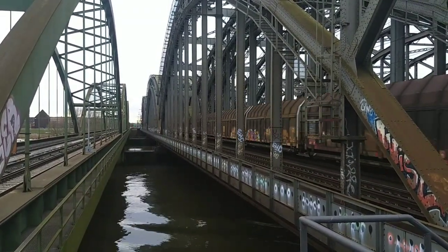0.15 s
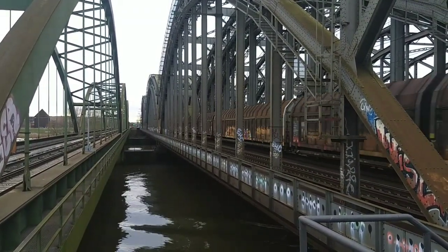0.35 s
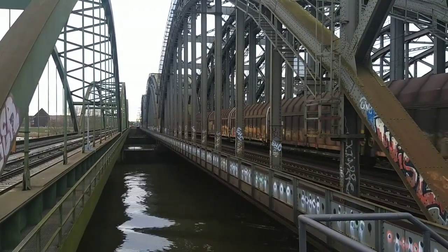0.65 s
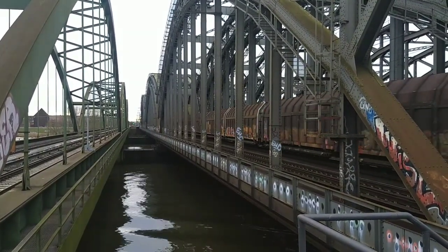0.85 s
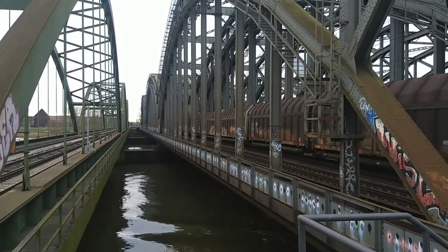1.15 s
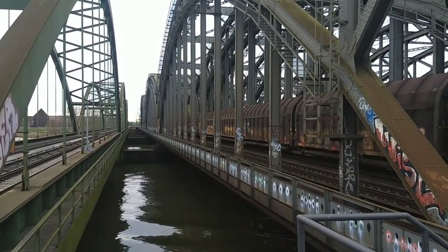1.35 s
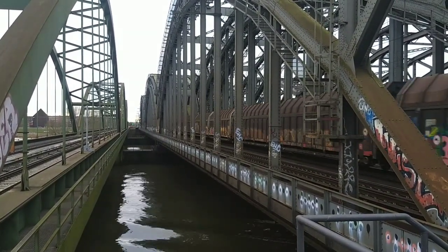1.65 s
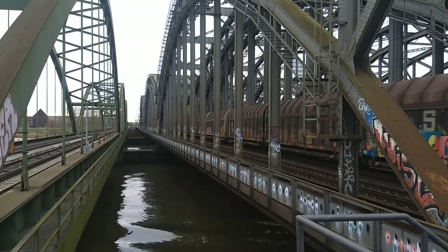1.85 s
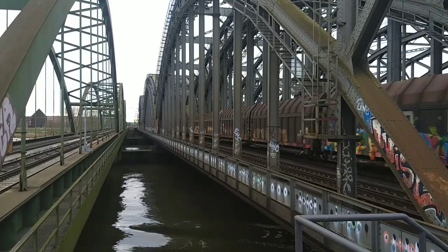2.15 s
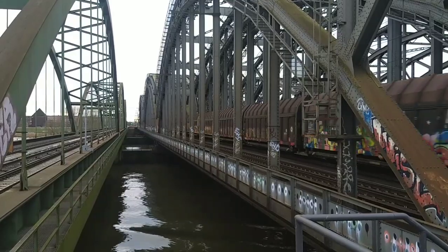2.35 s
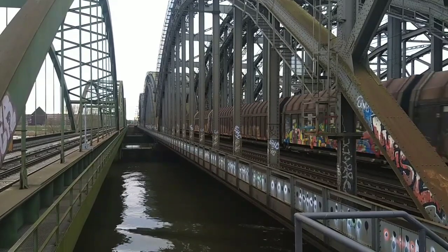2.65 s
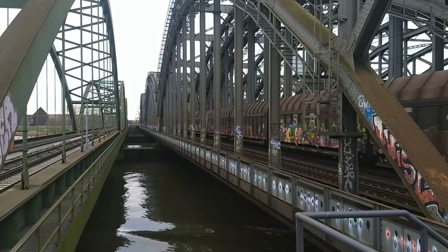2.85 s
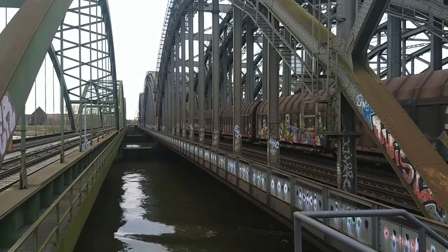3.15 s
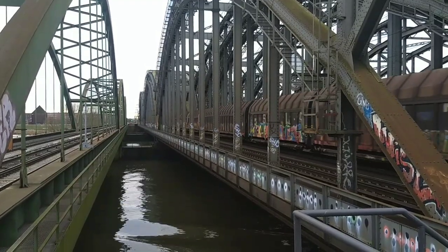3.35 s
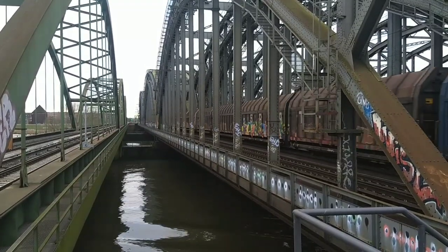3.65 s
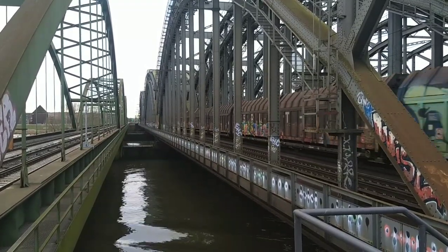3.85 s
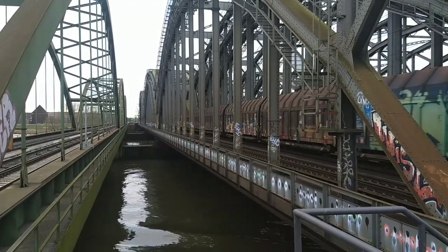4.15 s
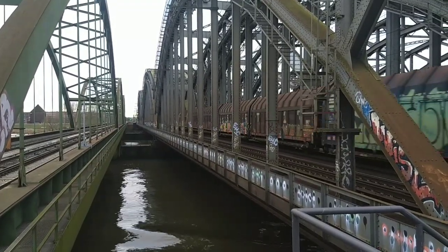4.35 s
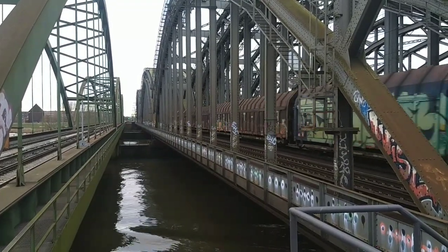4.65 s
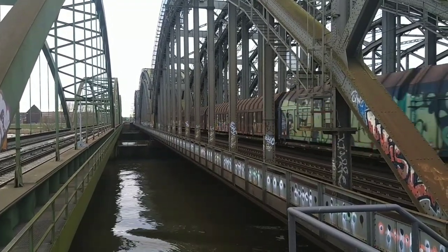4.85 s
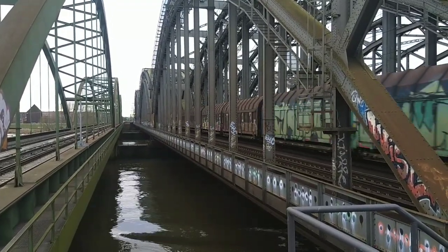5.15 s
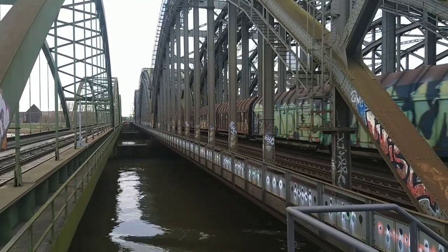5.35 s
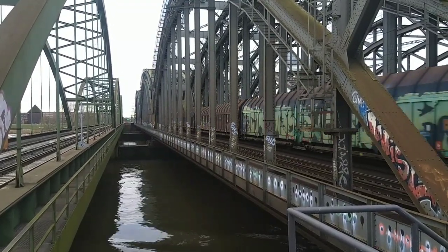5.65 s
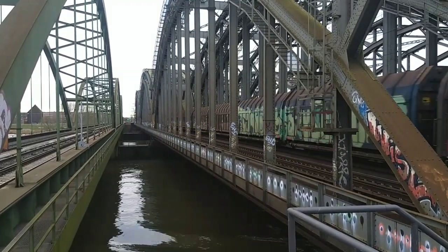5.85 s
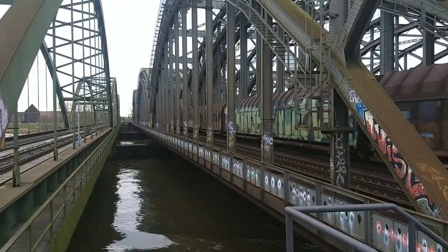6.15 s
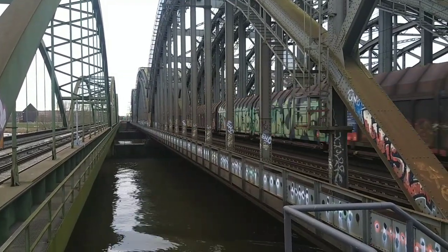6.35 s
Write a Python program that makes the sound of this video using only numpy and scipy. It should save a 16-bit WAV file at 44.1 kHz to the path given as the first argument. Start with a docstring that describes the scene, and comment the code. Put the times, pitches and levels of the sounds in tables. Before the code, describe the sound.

From 0 s a long freight train is in full passage over a steel truss bridge, heard close by from the side walkway in wide stereo. A loud, dense, hollow roar of girders and rails fills the low-mid range, above a softer span drone and deck rumble. Wheels add grainy metallic ringing and a thin, diffuse hiss. The roar flutters throughout, with short low bumps and tiny dips; the hiss thins around 0.7-1 s, then rises near 1.6 s. Blunt faint knocks at about 1 and 1.9 s are nearly buried. Narrow raspy steel tones swell and fade, some low and humming, others higher, with short scrapy touches near 3.6 and 3.9 s. From 5 to 6 s a few more dull knocks surface slightly at about 5.0, 5.3 and 5.9 s. The wheel noise ends a little brighter, still rolling at full strength when it stops around 6.5 s.

```python
"""A long freight train rolls steadily over a steel truss bridge, heard in stereo from the walkway beside it.
From the start, noise bands roar and hiss: rough wheels shake span, deck, girders and rails, wheels ring and hiss.
All along, the low bands briefly swell or sink and single steel modes sing as narrow noise that swells and fades.
Six faint blunt accents near 1 and 1.9 s and from 5 to 6 s lie almost buried in the roar.
Two microphone ports, each less a delayed share of the other, widen the picture throughout."""
import sys
import numpy as np
from scipy import signal
from scipy.fft import rfft, irfft
from scipy.io import wavfile
from scipy.ndimage import uniform_filter1d, minimum_filter1d

SR = 44100
rng = np.random.default_rng(int(sys.argv[2]) if len(sys.argv) > 2 else 0)


def file_out(sig):
    """Save sig as 16-bit WAV at sys.argv[1]."""
    # one column per channel
    cols = np.atleast_2d(sig).T
    # limit, then scale
    lim = np.clip(cols, -1, 1)
    pcm = np.round(lim * 32767).astype(np.int16)
    wavfile.write(sys.argv[1], SR, pcm)


N = 287091

# how alike the two ports hear the bridge: freq_hz, likeness_0_to_1
PORT_LIKENESS = [(30, .58), (70, 0.7), (150, 0.88), (300, 0.9), (430, 0.76), (520, 0.63), (650, 0.9),
                 (1000, 0.77), (1400, 0.3), (1700, 0.28), (3000, 0.08), (15000, 0)]


def from_db(db):
    """Decibels to amplitude gain."""
    return 10 ** (np.asarray(db) / 20)


def rms_one(x):
    """The same signal at rms 1."""
    return x / np.sqrt(np.mean(x ** 2) + 1e-20)


def in_time(rows):
    """Each column of a time table, interpolated to every sample."""
    time_s, *columns = np.transpose(rows)
    return [np.interp(np.arange(N) / SR, time_s, column) for column in columns]


def bins():
    """Frequency of each spectral bin in Hz, at least 1."""
    return np.maximum(np.arange(N // 2 + 1) * SR / N, 1)


def at_hz(points, hz):
    """A table read on a log-frequency axis."""
    freq_hz, value = np.transpose(points)
    return np.interp(np.log(hz), np.log(freq_hz), value)


def likeness(hz):
    """Correlation of the two ports at a frequency: high in the bass, none at the top."""
    return np.clip(at_hz(PORT_LIKENESS, hz), 0, .98)


def drift(rate_hz):
    """Slow chance: noise at every 40th sample through a double one-pole low-pass; rms 1."""
    step, settle = 40, 2000
    pole = np.exp(-2 * np.pi * rate_hz * step / SR)
    noise = rng.standard_normal(N // step + settle + 2)
    slow = signal.lfilter([1], [1, -2 * pole, pole ** 2], noise)[settle:]
    return np.interp(np.arange(N) / step, np.arange(len(slow)), rms_one(slow))


def swells(times_s, heights, sigma_s):
    """A Gaussian rise (or fall, if negative) at each moment, summed at every sample."""
    t = np.arange(N) / SR
    rows = np.broadcast(times_s, heights, sigma_s)
    return sum(height * np.exp(-((t - s) / sigma) ** 2 / 2) for s, height, sigma in rows)


def ring(clicks, hz, t60_s):
    """A two-pole resonance: a unit click sets a mode of height 1 ringing, with little bass below it."""
    pole = from_db(-60 / (t60_s * SR))
    turn = 2 * np.pi * hz / SR
    # the tiny offset keeps the decay clear of denormals
    return signal.lfilter([.5, 0, -.5], [1, -2 * pole * np.cos(turn), pole ** 2], clicks + 1e-18)


def at_ports(gain):
    """Coloured noise at two ports of unequal sensitivity: alike in the bass, unrelated in the treble; rms 1."""
    # left over right sensitivity: freq_hz, difference_db
    facing_db = [(30, 1), (150, 0.5), (300, 1), (480, 1), (650, 0), (1800, 6.5), (3000, -1.5), (4200, 5.5),
                 (8500, 6), (13000, 0)]
    hz = bins()
    alike = likeness(hz)
    common, apart = rng.standard_normal((2, len(hz))) + 1j * rng.standard_normal((2, len(hz)))
    sides = np.array([[1], [-1]])
    ports = np.sqrt(1 + alike) * common + np.sqrt(1 - alike) * apart * sides
    facing = from_db(sides * at_hz(facing_db, hz) / 2)
    return rms_one(irfft(gain * ports * facing / np.hypot(*facing), N))


def shaken(spectrum, steadiness, span_s):
    """Noise for one part's overlapping modes; many axles keep the drive even, so its power is levelled."""
    hz = bins()
    inside = (hz >= spectrum[0][0]) & (hz <= spectrum[-1][0])
    noise = at_ports(from_db(at_hz(spectrum, hz)) * inside)
    power = uniform_filter1d(noise.mean(axis=0) ** 2, max(int(span_s * SR), 2))
    return rms_one(noise / (power + 1e-9) ** (steadiness / 2))


def driven(drive, course_db, lull_db, flutter_hz):
    """Gain of one part: it takes its share of a level course and of the dips, and flutters by itself."""
    level_db, follows, dips, flutter_db = drive
    return from_db(level_db + follows * course_db - dips * lull_db + flutter_db * drift(flutter_hz))


def truss(x, ripple_db, width_hz, hold_s):
    """Echoes between the girders interfere: narrow peaks and dips wander as the wagons move on."""
    size = 4096
    overlap = size * 3 // 4
    hz, t, frames = signal.stft(x, SR, nperseg=size, noverlap=overlap)
    ripple = rng.standard_normal(frames.shape[1:])
    for _ in range(2):
        ripple = uniform_filter1d(ripple, max(round(width_hz / hz[1]), 1), axis=0)
        ripple = uniform_filter1d(ripple, max(round(hold_s / t[1]), 1), axis=1)
    # each peak takes its power from the dips beside it
    ripple = ripple - uniform_filter1d(ripple, size=13, axis=0)
    gain = rms_one(from_db(ripple_db * rms_one(ripple)))
    return signal.istft(frames * gain, SR, nperseg=size, noverlap=overlap)[1][:, :N]


def accents(level_db, scatter_db, burst_db, burst_t60_s, cutoff_hz):
    """Faint blunt accents in the roar: short noise bursts through decaying resonances, each with its own strength."""
    # accents: time_s, relative_peak_db
    moments = [(0.982, 0), (1.892, 2), (5.009, -2.5), (5.329, 3), (5.916, 2), (5.984, -1)]
    # accent resonances: freq_hz, relative_level_db, t60_s
    resonances = [(244, -10, 0.1), (321, -12, 0.2), (343.5, -2, 0.13), (620, -1, 0.093), (667, -9.5, 0.22),
                  (779, -5, 0.16), (873, -8, 0.074), (1200, -28, 0.083), (1640, -22, 0.051),
                  (3100, -28, .05)]
    time_s, peak_db = np.transpose(moments)
    out = np.zeros((2, N))
    for hz, mode_db, t60_s in resonances:
        strength_db = peak_db + mode_db + level_db + scatter_db * rng.standard_normal(len(time_s))
        clicks = np.zeros(N)
        clicks[(time_s * SR).astype(int)] = from_db(strength_db)
        out += ring(clicks, hz, t60_s) * rng.choice([-1, 1])
    t = np.arange(SR // 4) / SR
    burst = from_db(burst_db - 60 * t / burst_t60_s) * rng.standard_normal((2, len(t)))
    burst[:, 0] = 1  # a unit click comes first
    blunt = signal.butter(2, cutoff_hz, fs=SR, output="sos")
    return signal.sosfilt(blunt, signal.fftconvolve(out, burst, axes=1)[:, :N])


def singing():
    """Wheel, rail or girder modes swell and fade as narrow noise; the wider the band, the more it rasps."""
    # notes: loudest_s, sigma_s, freq_hz, level_db (rms before the swell), width_hz
    notes = [(.07, .04, 13000, -76, 60), (.19, .05, 8634, -66, 60), (.38, .06, 7990, -66, 60),
             (0.424, .08, 150, -29.5, 18), (0.032, .04, 322, -27, 24), (.6, .15, 316, -23, 58),
             (1.0, 0.054, 3369, -47, 35), (1.0, .06, 642, -29.5, 30), (1.45, 0.28, 1760, -41, 27),
             (1.53, 0.066, 3530, -43, 55), (1.55, 0.17, 1004, -33, 23), (1.62, 0.03, 3730, -35.5, 220),
             (1.62, .1, 13000, -79, 70), (2.09, .05, 3250, -44, 300), (2.15, .1, 8500, -62, 300),
             (2.295, 0.17, 295.3, -27, 41), (2.35, .17, 2150, -42, 55), (2.45, 0.32, 1524, -37, 60),
             (2.65, .25, 11820, -72, 60), (2.97, 0.06, 2150, -36, 55), (2.7, 1.8, 8660, -59, 110),
             (3.6, 1.1, 3772, -49, 40), (3.17, .08, 627, -26.5, 40), (3.44, .04, 613, -23, 30),
             (3.58, .025, 2400, -35.5, 300), (3.66, 0.11, 687, -23.5, 18), (3.65, 0.28, 1600, -34, 50),
             (3.848, 0.22, 378.7, -29.5, 38), (3.92, .025, 1644, -28, 200), (4.3, 0.074, 289.3, -28, 27),
             (4.45, 0.23, 1545, -37.5, 60), (4.54, .1, 2120, -41, 35), (4.56, .06, 13000, -75, 60),
             (4.77, 0.1, 3790, -46, 70), (4.82, .08, 2368, -39.5, 50), (5.25, 0.28, 1678, -38, 18),
             (5.15, .13, 12600, -66, 1000), (5.248, 0.18, 650, -24.5, 20), (5.69, .08, 2357, -36.5, 40),
             (5.67, .1, 12998, -72, 20), (3.3, 1.5, 12995, -81, 14), (6.05, 0.33, 384.3, -28.5, 55),
             (6.0, 0.09, 738, -29, 25), (6.2, 0.3, 1662, -37, 24), (5.7, .8, 7925, -68, 50),
             (6.08, .025, 3400, -39, 500), (6.49, 0.06, 3260, -41, 54)]
    step = 16  # the waver is computed at every 16th sample
    t, out = np.arange(N) / SR, np.zeros((2, N))
    for loudest_s, sigma_s, hz, level_db, width_hz in notes:
        near = np.abs(t - loudest_s) < 3 * sigma_s
        narrow = signal.butter(2, width_hz / 2, fs=SR / step, output="sos")
        slow = signal.sosfilt(narrow, rng.standard_normal((2, 2, len(t[::step]))))
        common, apart = (np.interp(t[near], t[::step], real + 1j * imag) for real, imag in slow)
        alike = likeness(hz)
        waver = np.sqrt(1 + alike) * common + np.sqrt(1 - alike) * apart * [[1], [-1]]
        tone = (waver * np.exp(2j * np.pi * hz * t[near])).real
        swell = from_db(level_db) * np.exp(-((t[near] - loudest_s) / sigma_s) ** 2 / 2)
        out[:, near] += swell * rms_one(tone)
    return out


def wheels(ring_db, hiss_db, lull_db):
    """Wheel discs ring with the rolling contact, treads and flanges hiss; all flutter as the bogies sway."""
    # spectra: freq_hz, relative_db_per_hz
    disc_spectrum = [(1700, -30), (2100, -1.5), (2360, 2.5), (2600, -2.5), (2850, -6), (3150, -3.5),
                     (3450, -8.5), (3800, -6), (4400, -9.5), (5400, -35.5)]
    tread_spectrum = [(3900, -12), (4700, -3.5), (5400, 1.5), (6000, -1.5), (6600, 0), (7600, -6),
                      (8650, -11.5), (9600, -37)]
    flange_spectrum = [(7000, -22), (8300, 0), (8900, -2.5), (9800, 2.5), (10800, -2), (11800, -7),
                       (12500, -6), (13600, -8), (14400, -13), (15000, -8), (15750, -15)]
    # tread hiss drive: level_db, share_of_course, share_of_dip, flutter_db
    tread_drive = (-41, 0.97, 0.95, 0.58)
    # tread hiss course, used as deviation from its mean: time_s, level_db
    tread_course = [(0, -44), (0.3, -43.5), (0.45, -42.5), (0.7, -45.0), (1.05, -44.4), (1.35, -42.5),
                    (1.6, -41), (1.75, -41.6), (1.88, -44), (2.05, -40.5), (2.4, -41.5), (2.8, -42),
                    (3.25, -43), (3.7, -40), (4.05, -42.7), (4.3, -41.5), (4.5, -43.5), (4.85, -41.2),
                    (5.2, -42), (5.5, -41), (6.0, -39.6), (6.51, -41)]

    disc_gain = from_db(ring_db + 0.27 - 1.1 * lull_db)
    discs = disc_gain * shaken(disc_spectrum, steadiness=0.49, span_s=0.13)

    tread_db, = in_time(tread_course)
    tread_gain = driven(tread_drive, tread_db - tread_db.mean(), lull_db, flutter_hz=20)
    treads = tread_gain * shaken(tread_spectrum, steadiness=.4, span_s=.1)

    flange_gain = from_db(hiss_db - 7.5 - .9 * lull_db + .7 * drift(14))
    flanges = flange_gain * shaken(flange_spectrum, steadiness=.4, span_s=.1)
    return from_db(0.5 * drift(13)) * (discs + treads + flanges)


def rail_head(rolling_db, lull_db):
    """The rail's higher bending modes lie between the roar and the wheel ring."""
    # spectrum: freq_hz, relative_db_per_hz
    head_spectrum = [(1150, -21), (1400, -7), (1550, -2), (1680, -0.2), (1850, -2.5), (2000, -7.5),
                     (2500, -34)]
    # drive: level_db, share_of_rolling_swing, share_of_dip, flutter_db
    head_drive = (-29, 0.46, 1.4, 1.13)
    gain = driven(head_drive, rolling_db, lull_db, flutter_hz=22)
    return gain * shaken(head_spectrum, steadiness=0.85, span_s=0.093)


def bridge(rolling_db, deck_db, girder_db, rail_db, lull_db):
    """Span drones and deck rumbles at their own levels; girder webs boom and rails roar with the wheel level."""
    # spectra: freq_hz, relative_db_per_hz
    span_spectrum = [(15, -18), (25, -22), (33, -20.5), (50, -12), (64, -2.5), (72, -6), (81, -0.5),
                     (100, -2), (130, -25)]
    deck_spectrum = [(85, -30), (105, -12), (125, -5.5), (152, 0.5), (185, -1), (260, -42)]
    girder_spectrum = [(145, -24.5), (205, -6), (240, -3.5), (295, 0), (335, 0), (380, -2), (440, -4.5),
                       (490, -6), (640, -21.5)]
    rail_spectrum = [(400, -28.5), (530, -7), (590, -1.5), (650, -0.5), (760, -2), (880, -4.5),
                     (1000, -8.5), (1200, -13), (1400, -20), (1600, -32)]
    # drives: level_db, share_of_course, share_of_dip, flutter_db
    span_drive = (-41, 1, 1, .5)
    deck_drive = (-32.5, 0, 0, 0.85)
    girder_drive = (-20, 0.67, 1.1, 0.45)
    rail_drive = (-17.5, 0.9, 1, .5)
    # span drone course, used as deviation from its mean: time_s, level_db
    drone_course = [(0, -42.6), (0.2, -37.5), (0.8, -43), (1.2, -40.6), (1.6, -38), (2.1, -41),
                    (2.4, -36.5), (2.7, -43), (3.0, -40), (3.35, -40), (3.8, -37), (4.2, -38), (4.7, -39.2),
                    (5.3, -40.6), (5.7, -38.6), (6.1, -38.5), (6.51, -41)]

    drone_db, = in_time(drone_course)
    span_gain = driven(span_drive, drone_db - drone_db.mean(), lull_db, flutter_hz=3)
    span = span_gain * shaken(span_spectrum, steadiness=0.5, span_s=0.29)

    deck_gain = driven(deck_drive, rolling_db, lull_db, flutter_hz=8.3)  # its share of the rolling is 0
    deck = deck_gain * shaken(deck_spectrum, steadiness=0.38, span_s=0.059)

    girder_gain = driven(girder_drive, rolling_db, lull_db, flutter_hz=25)
    girders = girder_gain * shaken(girder_spectrum, steadiness=0.49, span_s=0.098)

    rail_gain = driven(rail_drive, rolling_db, lull_db, flutter_hz=25)
    rails = rail_gain * shaken(rail_spectrum, steadiness=0.4, span_s=0.073)
    return span + from_db(deck_db) * deck + from_db(girder_db) * girders + from_db(rail_db) * rails


def scene():
    """The train at the two ports: girders and rails swell with the wheel level, deck and span keep their own."""
    # rougher and smoother wheels pass: time_s, wheel_ring_db, flange_hiss_db (both before the trims in wheels)
    passing_wheels = [(0, -33, -50.5), (.2, -32.5, -50), (.45, -31, -51), (.65, -32.5, -54),
                      (1.05, -31.5, -53), (1.45, -31.5, -50.5), (1.62, -29, -48), (1.75, -31, -50),
                      (1.9, -32.5, -50.5), (2.04, -30.5, -47.5), (2.42, -31.5, -48), (2.72, -30.5, -49),
                      (2.93, -31, -49), (3.2, -32, -49), (3.6, -30, -47.5), (4.0, -30.5, -51.5),
                      (4.3, -30, -49.5), (4.55, -31.5, -50), (4.83, -30, -49), (5.1, -30.5, -49),
                      (5.4, -30, -48.5), (5.95, -30, -48), (6.51, -29.5, -50)]
    # short rises and falls of the low bands' level: time_s, deck_db, girder_db, rail_db
    level_swells = [(.243, 6, 3, 0), (.38, 2, 0.5, 1.5), (.476, 4.5, 1, -1.5), (.55, 1, 2.5, -0.5),
                    (.998, 1, 5, -0.5), (1.298, 4, 3, 1.5), (1.587, 5.5, 1, -1.5), (1.901, 8.5, -1, -4),
                    (2.175, 0, 2, 2), (2.45, 2, 0.5, 0.5), (2.62, 1.5, 1.5, 1.5), (2.86, 1, -2.5, 1.2),
                    (3.06, 4.5, 2, 2), (3.19, -1, 2.5, -1), (3.647, 3, 0.5, 0), (3.78, -7, 5, 0),
                    (4.112, 4, 2, 2), (4.36, 2, 2.5, 1.5), (4.6, 7, 3, -1), (4.828, -0.5, 1, 0.5),
                    (5.135, 9, 1.5, 1), (5.334, 4, -2, -0.5), (5.918, 2, -1, .5), (6.284, -8, 2.5, 1)]
    # brief dips of the roar, before each part's share: time_s, depth_db (negative lifts), sigma_s
    lulls = [(0.138, .8, .03), (.31, 1.7, .025), (0.643, 1.3, 0.041), (.85, 1, .027), (1.04, 2, 0.022),
             (1.916, 1.1, .03), (2.302, 1.5, 0.02), (2.738, 1.5, 0.027), (3.124, 1, .03), (3.32, 1.3, .022),
             (4.432, 2, .028), (4.56, -0.6, .02), (4.678, 1.5, 0.025), (4.985, 2.5, 0.028),
             (5.24, 2, 0.028), (6.154, 2, .036)]

    ring_db, hiss_db = in_time(passing_wheels)
    rolling_db = ring_db - ring_db.mean()
    swell_s, *heights_db = np.transpose(level_swells)
    deck_db, girder_db, rail_db = (swells(swell_s, heights, sigma_s=0.018) for heights in heights_db)
    lull_db = swells(*np.transpose(lulls))

    accent = accents(level_db=-14.5, scatter_db=2.5, burst_db=-29.0, burst_t60_s=.09, cutoff_hz=2200)
    wheel_noise = wheels(ring_db, hiss_db, lull_db)
    scrape = truss(wheel_noise, ripple_db=1.03, width_hz=55, hold_s=0.16)
    steel = rail_head(rolling_db, lull_db) + bridge(rolling_db, deck_db, girder_db, rail_db, lull_db)
    roar = truss(steel, ripple_db=0.6, width_hz=32, hold_s=0.33)
    return accent + singing() + scrape + roar


def limiter(x, ceiling, hold_s):
    """The gain ducks smoothly around the peaks that would pass the ceiling."""
    size = int(hold_s * SR)
    gain = ceiling / np.maximum(np.abs(x).max(axis=0), ceiling)
    return x * uniform_filter1d(minimum_filter1d(gain, size), size)


def record(dry):
    """Each port loses a delayed share of the other, the colour is evened out, peaks are held, the top is cut."""
    # share of each port subtracted from the other: freq_hz, share_0_to_1
    crossfeed = [(400, 0.1), (520, 0.46), (650, 0.53), (1100, 0.8), (2300, 0.76), (3400, 0.88), (4400, 1),
                 (11500, 1), (14000, .75)]
    port_lag_s, cutoff_hz, fade_s = .000433, 15750, .003
    from_edge = np.minimum(np.arange(N), np.arange(N)[::-1])
    fade = np.minimum(from_edge / (fade_s * SR), 1)
    hz, ports = bins(), rfft(dry * fade)
    feed = np.clip(at_hz(crossfeed, hz), 0, 1) * np.exp(-2j * np.pi * hz * port_lag_s)
    # the colour that the subtraction gives partly alike ports
    colour = np.sqrt(1 + np.abs(feed) ** 2 - 2 * likeness(hz) * feed.real)
    wide = irfft((ports - feed * ports[::-1]) / colour, N)
    held = limiter(wide, ceiling=.88, hold_s=.012)
    top_cut = 1 / (1 + (hz / cutoff_hz) ** 400)
    return irfft(rfft(held) * top_cut, N)


dry = scene()
out = record(dry)
file_out(out)
```